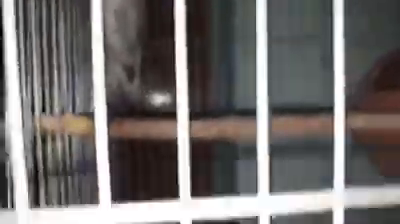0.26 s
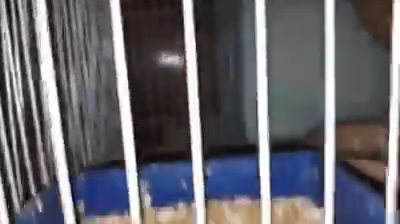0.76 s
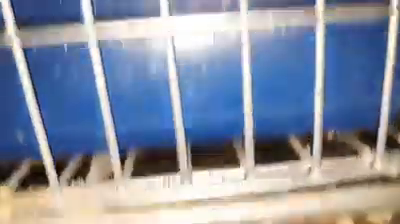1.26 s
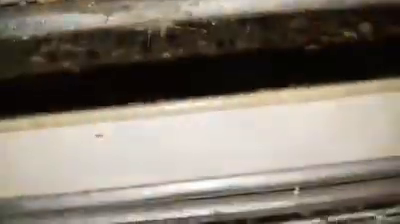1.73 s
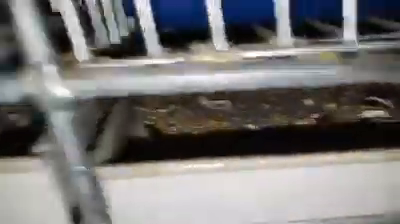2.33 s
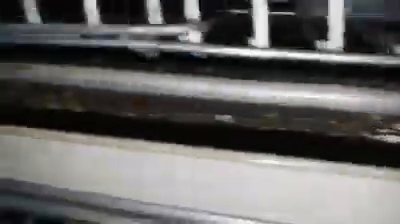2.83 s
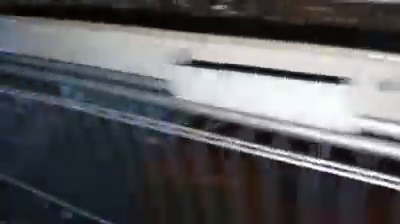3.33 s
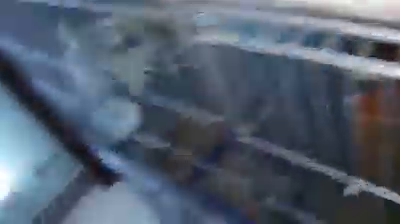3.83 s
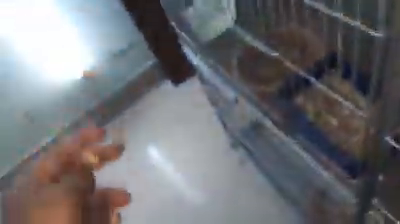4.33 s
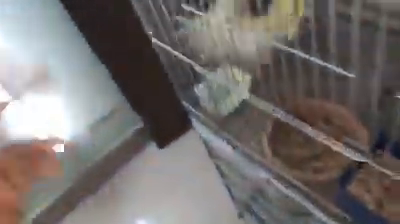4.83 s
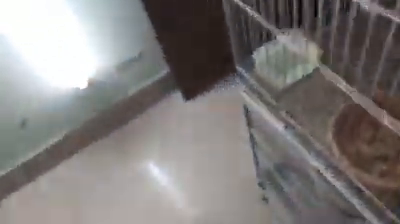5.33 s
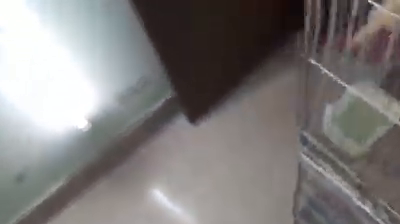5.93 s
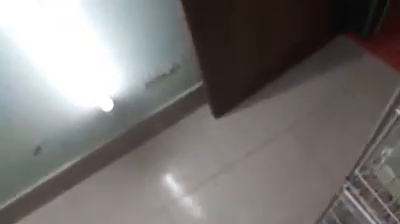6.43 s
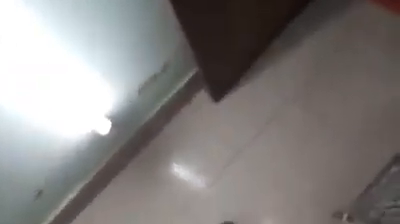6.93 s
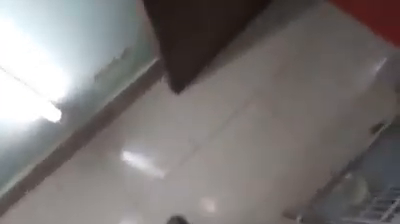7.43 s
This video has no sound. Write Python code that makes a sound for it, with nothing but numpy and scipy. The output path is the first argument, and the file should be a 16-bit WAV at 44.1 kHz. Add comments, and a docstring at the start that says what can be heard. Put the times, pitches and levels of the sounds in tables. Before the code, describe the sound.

Close wing flutter and hard slaps on a wire cage, piercing bird calls, soft rustling and dull microphone taps in an echoing tiled room.

```python
"""In a hard-walled tiled room, lovebirds flutter about a wire cage close to a hand-held camera.
Whistles are gliding harmonic tones; screeches are uneven puffs of noise ringing a throat and beak.
Wings slap the bars, stir the air and brush in bursts of grainy noise, and later a hand or clothes rustle
softly in the same way; calls and strokes ring in the room. A fan hums behind as two tones, under a low
rush of air shaped from noise, and dull taps arrive through the camera's body."""
import sys
import numpy as np
from scipy import signal
from scipy.fft import rfft, irfft, next_fast_len
from scipy.io import wavfile
from scipy.ndimage import uniform_filter1d, minimum_filter1d, map_coordinates

SR = 44100
rng = np.random.default_rng(int(sys.argv[2]) if len(sys.argv) > 2 else 0)


def unload_audio(sound):
    """Save the sound as a 16-bit wav file, at the path given as the first command line argument."""
    columns = np.transpose(np.atleast_2d(sound))
    # keep every value between -1 and 1, then stretch to whole-number steps
    steps = np.round(np.clip(columns, -1, 1) * 32767)
    wavfile.write(sys.argv[1], SR, steps.astype(np.int16))


N = 338247
TOP_HZ = 8630  # upper band limit


def amp(db):
    """Decibels to gain."""
    return 10 ** (np.asarray(db) / 20)


def unit(x):
    """Scale to rms 1."""
    return x / np.sqrt(np.mean(x ** 2) + 1e-20)


def along(points, hz):
    """(Hz, value) points read on a log frequency axis."""
    point_hz, values = np.transpose(points)
    return np.interp(np.log(hz + 1), np.log(point_hz + 1), values)


def curve(rows):
    """(seconds, value) rows as one value per sample."""
    return np.interp(np.arange(N) / SR, *np.transpose(rows))


def wobble(rate, size=N):
    """A smooth random curve with rate knots a second."""
    knots = rng.standard_normal(int(size * rate / SR) + 4)
    return map_coordinates(knots, [np.arange(size) * rate / SR])


def filtered(x, response):
    """x shaped by a response given as a function of frequency."""
    size = next_fast_len(len(x) + 8192)
    spectrum = rfft(x, size) * response(np.fft.rfftfreq(size, 1 / SR))
    return irfft(spectrum, size)[:len(x)]


def coloured(x, spectrum):
    """x with the given (Hz, dB) colour below the band limit, at rms 1."""
    return unit(filtered(x, lambda hz: amp(along(spectrum, hz)) * (hz < TOP_HZ)))


def add(track, s, x):
    """Mix x into the track at s seconds."""
    i = max(round(s * SR), 0)
    track[i:i + len(x)] += x[:max(N - i, 0)]


def gate(size, edge):
    """A flat envelope with soft ends, edge seconds long."""
    return signal.windows.tukey(size, min(2 * edge * SR / size, 1))


def grainy(rate, depth_db):
    """Noise broken into grains, as barbs catch and slip."""
    return unit(rng.standard_normal(N) * amp(depth_db * wobble(rate)))


# Third harmonic: dB over the fundamental when the octave is at 0 dB; dB it gains per dB of the octave.
THIRD_DB, THIRD_FOLLOWS = -6, 0.69


def syrinx(pitch, scatter, db, octave_db, scatter_rate=900, throb_rate=450, throb_db=2.5):
    """A whistle of three harmonics; the more its pitch scatters, the more its level throbs."""
    n = len(pitch)
    scattered_hz = pitch * (1 + scatter * wobble(scatter_rate, n))
    phase = 2 * np.pi * np.cumsum(scattered_hz) / SR
    throb = unit(amp(throb_db * np.tanh(scatter / 0.022) * wobble(throb_rate, n)))
    gains = [1, amp(octave_db), amp(THIRD_DB + THIRD_FOLLOWS * octave_db)]
    tone = sum(g * np.sin(k * phase) for k, g in enumerate(gains, 1))
    tone = tone / np.sqrt(sum(g * g for g in gains) / 2)
    return amp(db) * tone * throb * gate(n, edge=0.0046)


# Short chirps from the cage, near the microphone. Each row: start in seconds, length in seconds,
# start pitch in Hz, end pitch in Hz, pitch scatter as a share, level in dB before the room and mix,
# octave over fundamental in dB.
SHORT_CHIRPS = [(0.0, 0.051, 2900, 2660, 0.06, -32.5, -2), (0.279, 0.055, 2790, 2770, .008, -21, 28),
                (0.369, 0.051, 2050, 2040, .02, -26.5, 1), (0.904, 0.064, 2510, 2490, 0.07, -46, -9),
                (1.002, 0.17, 3750, 3500, 0.12, -47, -22), (1.332, 0.035, 2500, 2650, 0.14, -34, 3),
                (2.245, 0.042, 4730, 3710, 0.092, -23.5, -11), (2.508, 0.049, 2976, 3100, 0.019, -16, -12),
                (4.07, 0.055, 3200, 3150, 0.014, -40, -3), (4.681, 0.084, 3170, 3214, 0.032, -32.5, 6.5),
                (6.066, 0.15, 2514, 2530, .065, -38, -14), (6.092, 0.075, 3590, 2970, 0.075, -30, 1),
                (6.197, 0.0385, 2900, 2760, 0.036, -14, 27), (6.47, 0.065, 2350, 2916, 0.052, -23.5, 16),
                (6.541, 0.055, 3050, 3106, 0.0089, -16, 4), (6.622, .06, 4687, 4687, .001, -16.5, -40),
                (6.884, .055, 3500, 2600, 0.032, -19, 3.5), (6.896, 0.046, 2850, 2040, .03, -24.5, 2),
                (6.947, 0.053, 2350, 3100, 0.02, -26.5, 4), (7.255, .028, 3246, 3154, 0.026, -21.5, 7),
                (7.291, .083, 3190, 3200, 0.023, -26.5, -16),
                (7.263, 0.087, 2150, 2066, 0.032, -28.5, -1.5)]
# Long calls from the cage, one list of rows per call. Each row: time in seconds, pitch in Hz,
# pitch scatter as a share, level in dB before the room and mix, octave over fundamental in dB.
BENDING_CALLS = [
    [(.241, 2480, 0.053, -27.5, 3), (.28, 2540, 0.032, -13, 15), (.305, 2600, 0.0057, -14.5, -1),
     (.322, 2560, 0.043, -24, 14), (.38, 2520, .015, -16, 18), (.42, 2630, 0.051, -20, 20),
     (.478, 2580, 0.054, -12, 29)],
    [(2.289, 2150, 0.077, -12, -19), (2.336, 3000, 0.063, -18.5, -19), (2.346, 3275, 0.0042, -7.5, -25),
     (2.372, 3300, .005, -14, -28), (2.384, 2810, 0.061, -17, -26), (2.47, 2653, 0.049, -14.5, -9),
     (2.57, 2468, 0.067, -19.5, -10), (2.636, 2370, 0.049, -19.5, 4)],
]


def whistles():
    """Chirps glide straight from one pitch to another; long calls bend and change colour as they go."""
    out = np.zeros(N)
    for s, length, start_hz, end_hz, scatter, db, octave_db in SHORT_CHIRPS:
        glide = np.linspace(start_hz, end_hz, int(length * SR))
        add(out, s, syrinx(glide, scatter, db, octave_db))
    for call in BENDING_CALLS:
        times, *controls = np.transpose(call)
        t = np.arange(times[0], times[-1], 1 / SR)
        add(out, times[0], syrinx(*[np.interp(t, times, c) for c in controls]))
    return out


# Harsh screeches, near the microphone. Each row: start in seconds, length in seconds, level in dB
# before the room and mix, swell over the length in dB, syrinx resonance in Hz,
# beak resonance in Hz, beak resonance level in dB.
HARSH_SCREECHES = [(0.259, 0.0345, -15, 4, 2300, 5300, 9.5), (0.317, 0.062, -17.5, -1, 2660, 6250, 16),
                   (.371, .055, -14.5, 17, 2240, 5200, 10.5), (2.456, 0.036, -17.5, -6, 2700, 6100, 10),
                   (2.571, 0.074, -20, -1, 2600, 6060, 14), (4.066, 0.055, -36, -1, 3070, 6600, 5),
                   (6.169, 0.05, -15, 1, 3470, 5630, 6.5), (6.498, .075, -15.5, 0, 2710, 6030, 2),
                   (6.567, 0.067, -12.5, -9, 3750, 4040, 11), (6.873, 0.16, -23, 2.5, 1990, 3100, -1.5),
                   (6.97, 0.078, -16.5, 5.5, 2900, 4040, 7.5), (7.125, .097, -32.5, 2, 2900, 4020, 2),
                   (7.214, 0.061, -23.5, 3, 2870, 4000, 8), (7.26, 0.061, -29.5, 4, 2300, 5250, 6)]
# Throat resonances shared by all screeches. Each row: centre in Hz, nominal width in Hz
# (the sharpness setting scales it), level in dB.
THROAT_RESONANCES = [(4220, 520, 0), (5470, 820, -2), (6380, 450, 1), (8030, 760, -2.5)]
SYRINX_WIDTH_HZ, SYRINX_DB, BEAK_WIDTH_HZ = 290, -2, 465  # widths nominal, as in the throat table
PUFF_RATE = 540  # puffs a second, before jitter


def screeches(jitter=.25, puff_decay=5, sharpness=0.61):
    """Driven hard, the syrinx breaks into uneven puffs that ring the throat; the beak picks out one band."""
    out = np.zeros(N)
    for s, length, db, swell_db, syrinx_hz, beak_hz, beak_db in HARSH_SCREECHES:
        n = int(length * SR)
        throat = [*THROAT_RESONANCES, (syrinx_hz, SYRINX_WIDTH_HZ, SYRINX_DB), (beak_hz, BEAK_WIDTH_HZ, beak_db)]
        cycle = np.cumsum(PUFF_RATE * (1 + jitter * wobble(PUFF_RATE, n))) / SR % 1
        puffs = np.exp(-puff_decay * cycle) * rng.standard_normal(n)

        def tract(f):
            """Resonances summed as power."""
            return np.sqrt(sum(amp(level) ** 2 / (1 + (sharpness * (f - hz) / width) ** 2) ** 6
                               for hz, width, level in throat))

        swell = amp(db + swell_db * np.linspace(-.5, .5, n))
        add(out, s, unit(filtered(puffs, tract)) * swell * gate(n, edge=0.0014))
    return out


# Hard wing strokes against the cage bars, near the microphone. Each row: start in seconds,
# slap level in dB, push of air over the slap in dB, both before their layer gains.
HARD_STROKES = [(.0674, -17, 4), (.176, -21, 2), (1.265, -20, -6), (1.411, -18, -10), (1.4564, -18, 17),
                (1.534, -10, 4.5), (1.585, -17, 16), (1.6821, -16.5, 15.5), (1.7605, -14.5, 18.5),
                (1.7876, -12.5, -7), (1.807, -18, -7), (1.901, -15.5, 14), (1.955, -18.5, 13),
                (2.015, -21, 14), (2.052, -13.5, 1), (2.1046, -11.5, 7), (2.1197, -10.5, 8),
                (2.2308, -6.5, -7), (2.3602, -3, -8), (2.424, -7.5, 5), (2.753, -16.5, 3),
                (2.8563, -21, 16), (3.253, -23, 13), (3.3278, -23, 2), (3.3734, -19.5, -15),
                (3.433, -18, -8), (3.464, -16.5, -3), (4.6237, -12, 9), (4.6377, -19, 12),
                (4.7158, -15, -16), (4.7872, -6.5, 14), (4.8595, -17.5, 11), (4.9106, -20.5, 14)]
# Colour of feathers slapping wire, heard close. Each row: frequency in Hz, relative level in dB per Hz.
SLAP_COLOUR = [(200, -42), (600, -2.5), (1500, 4), (3300, 0.5), (5000, -1.5), (8500, 1.5)]


def strokes(rows, snap_t60=0.032, swish_t60=0.26, swish_db=-15, rise=0.00047):
    """Each stroke is a slap of stiff feathers, a trailing swish and a push of air; times in seconds."""
    slap, push = np.zeros(N), np.zeros(N)
    t = np.arange(SR // 5) / SR
    decay = amp(-60 * t / snap_t60) + amp(swish_db - 60 * t / swish_t60)
    shape = (1 - np.exp(-t / rise)) * decay
    for s, db, push_db in rows:
        add(slap, s, amp(db) * shape)
        add(push, s, amp(db + push_db) * shape)
    push_colour = [(40, -23), (120, 1.5), (350, -1.5), (900, -11), (2500, -18.5)]  # (Hz, dB)
    air = coloured(rng.standard_normal(N), push_colour)
    feathers = coloured(grainy(rate=1500, depth_db=0.5), SLAP_COLOUR)
    return amp(-6) * slap * feathers + amp(-20.5) * push * air


# Light strokes: number a second; slap level over the stirred-air gain, its spread, push over slap, in dB.
LIGHT_RATE, LIGHT_DB, LIGHT_SCATTER_DB, LIGHT_PUSH_DB = 12, 10.5, -0.5, 6


def light_strokes(air):
    """Lighter strokes at uneven intervals follow the stirred air of the moment: rows like HARD_STROKES."""
    count = int(LIGHT_RATE * N / SR)
    late, size = rng.random((count, 2)).T
    at = ((np.arange(count) + late) * N / count).astype(int)
    levels = 20 * np.log10(air[at]) + LIGHT_DB + LIGHT_SCATTER_DB * (2 * size - 1)
    return [(i / SR, db, LIGHT_PUSH_DB) for i, db in zip(at, levels)]


# Bursts of wing work and, from 3.651 to 5.498 seconds, soft rustling of a hand or clothes, all close.
# Each row: start in seconds, rise in seconds, length before dying away in seconds, stirred air in dB,
# brushing in dB, swell over the burst in dB; both levels are before the gains in flutter_and_rustle,
# and the brushing takes only a share of the swell.
MOVEMENT_BURSTS = [(-.05, 0.034, 0.26, -36, -31.5, -3), (1.215, 0.037, .17, -40, -35, 2),
                   (1.428, 0.042, 0.98, -35, -34.5, 9.5), (2.16, 0.039, 0.57, -33, -29.5, -9),
                   (3.25, 0.1, 0.39, -43.5, -39, 3), (3.651, 0.26, .28, -41, -33.5, 4),
                   (4.036, 0.032, 0.24, -41, -38, -5), (4.317, 0.15, 0.47, -42, -36.5, 3),
                   (5.01, 0.038, 0.059, -43, -37, 6), (5.146, 0.049, .16, -45.5, -46, 4),
                   (5.498, 0.066, 0.2, -56, -40.5, -6), (5.89, 0.11, 1.646, -47, -38.5, -0.5)]
BRUSH_SWELLS = 0.35  # share of a burst's swell that reaches the brushing
IDLE_AIR_DB, IDLE_BRUSH_DB = -50.5, -46  # fidgeting between bursts, before the same gains
RELEASE_T60_S = 0.69  # how a burst dies away


def movement():
    """Gains of stirred air and of brushing: each burst rises, swells or fades while it lasts, and dies away."""
    t = np.arange(N) / SR
    air, brush = amp(IDLE_AIR_DB), amp(IDLE_BRUSH_DB)
    for s, rise, length, air_db, brush_db, swell_db in MOVEMENT_BURSTS:
        release = amp(-60 * np.maximum(t - s - length, 0) / RELEASE_T60_S)
        shape = np.clip((t - s) / rise, 0, 1) * release
        swell = swell_db * (np.clip((t - s) / length, 0, 1) - .5)
        air = np.maximum(air, shape * amp(air_db + swell))
        brush = np.maximum(brush, shape * amp(brush_db + BRUSH_SWELLS * swell))
    return air, brush


# Colour of air stirred close to the microphone. Each row: frequency in Hz, relative level in dB per Hz.
STIRRED_AIR_COLOUR = [(18, -30.5), (30, -15.5), (98, -1), (194, -12.5), (289, -0.5), (464, -7), (522, -8.5),
                      (1160, -10.5), (3970, -20.5), (8450, -30.5), (11000, -42), (18600, -120)]
# Colour of the brushing, heard close. Each row: frequency in Hz, relative level in dB per Hz.
BRUSHING_COLOUR = [(800, -34), (2000, 3), (3300, 6), (4200, -1.5), (6000, 3.5), (7500, 2), (8600, 2.5)]


def flutter_and_rustle(air, brushing, beat_rate=19, beat_db=2, whoosh_db=4, brush_db=-2):
    """Quick beats, beat_rate a second on average, sway a whoosh of stirred air and a softer brushing."""
    uneven_rate = beat_rate * (1 + 0.202 * wobble(8.9))
    beat = np.sin(2 * np.pi * np.cumsum(uneven_rate) / SR)
    stirred = coloured(grainy(rate=630, depth_db=2), STIRRED_AIR_COLOUR)
    whoosh = air * amp(whoosh_db + beat_db * beat) * stirred
    barbs = coloured(grainy(rate=1700, depth_db=1.5), BRUSHING_COLOUR)
    brush = brushing * amp(brush_db + 1.0 * beat) * barbs
    return whoosh + brush


# Taps on the camera, right at the microphone. Each row: start in seconds, knock peak in dB,
# contact time scale in seconds, click over the knock in dB before a fixed lift.
CAMERA_TAPS = [(3.8042, -18, 0.00075, -30), (4.0692, -9.5, 0.00049, -22), (4.2266, -2.5, 0.00026, -23),
               (5.1947, -12.5, 0.00043, 0), (5.3562, -3.5, 0.00034, 0.5), (5.6894, -9.5, 0.00027, -3),
               (5.9022, -9.5, 0.000083, -1), (6.4241, -13.5, 0.00015, -20)]
# Ringing modes of the camera's body, around the microphone.
# Each row: frequency in Hz, 60 dB decay time in seconds, relative level in dB.
BODY_MODES = [(238, 0.019, 0), (520, 0.0033, 8), (1230, 0.0046, 0.5)]


def taps():
    """A fingertip pushes the camera's body, which rings very briefly; a firm contact adds a click."""
    out, t = np.zeros(N), np.arange(SR // 30) / SR
    ring = sum(amp(db - 60 * t / t60) * np.cos(2 * np.pi * hz * t) for hz, t60, db in BODY_MODES)
    # the held body leaks slow pressure away
    ring = signal.lfilter(*signal.butter(1, 130, 'high', fs=SR), ring)
    for s, db, contact, click_db in CAMERA_TAPS:
        push = t * np.exp(-2 * t / contact)
        knock = np.convolve(push, ring)[:len(t)]
        knock = knock / np.abs(knock).max()
        click = np.diff(np.exp(-t / .0002), prepend=0)
        add(out, s, amp(db) * (knock + amp(click_db + 2.0) * click))
    return out


# Colour of the low rush of air. Each row: frequency in Hz, relative level in dB per Hz.
LOW_RUSH_COLOUR = [(15, -43), (25, -36.5), (80, -17), (118, 2), (149, -12.5), (248, -3.5), (294, -7.5),
                   (326, -4.5), (499, -10.5), (592, -13), (2300, -23.5), (4000, -34), (5200, -51),
                   (8800, -120)]
# Level of the low rush of air at the microphone, from fan and wings together.
# Each row: time in seconds, level in dB before the low cut.
LOW_RUSH_LEVEL = [(0.0, -38.5), (0.19, -29), (0.45, -36), (1.26, -39), (1.83, -31), (2.24, -27.5),
                  (2.97, -39), (4.59, -33), (6.09, -32), (7.3, -40.5), (7.67, -37.5)]
# The motor's two hums, from behind. Each row: frequency in Hz, level in dB before its swell and wobble.
MOTOR_HUMS = [(119.5, -48), (328.4, -50)]
# Swell of the two hums at the microphone. Each row: time in seconds, deep hum in dB, upper hum in dB.
MOTOR_SWELL = [(0, -9, -2), (1.1, 4, 0.5), (3.2, -7.5, -2.5), (4.0, 11.5, 1.5), (5.4, -4, -3),
               (6.2, -1, 3.5), (7.67, 1, 5.5)]


def fan_and_low_rush():
    """A slightly unsteady motor hum of two swelling tones, and noise as a low rush that comes and goes."""
    t = np.arange(N) / SR
    times, *swells = np.transpose(MOTOR_SWELL)
    hum = np.zeros(N)
    for (hz, db), swell in zip(MOTOR_HUMS, swells):
        level = amp(db + np.interp(t, times, swell) + 2.6 * wobble(6.4))
        hum += level * np.sqrt(2) * np.sin(2 * np.pi * hz * t + 0.45 * wobble(4.6))
    rush = coloured(rng.standard_normal(N), LOW_RUSH_COLOUR)
    # thin out the deepest rumble
    rush = signal.lfilter(*signal.butter(1, 35, 'high', fs=SR), rush)
    return hum + amp(curve(LOW_RUSH_LEVEL)) * rush


# Ringing of the tiled room around cage and microphone.
# Each row: frequency in Hz, 60 dB decay time in seconds.
ROOM_DECAY = [(200, 0.86), (2500, 0.51), (5000, 0.44), (8500, 0.34)]


def room(x, wet_db):
    """Hard walls answer with a dense tail; direct sound and tail together about keep the power of x."""
    hz, t, bands = signal.stft(rng.standard_normal(int(SR * .7)), SR, nperseg=256)
    decay = amp(-60 * t / along(ROOM_DECAY, hz)[:, None])
    tail = signal.istft(bands * decay, SR, nperseg=256)[1]
    tail = np.pad(tail / np.linalg.norm(tail), (130, 0))  # 130 samples before the walls answer
    wet = signal.fftconvolve(x, tail)[:N]
    return (x + amp(wet_db) * wet) / np.hypot(1, amp(wet_db))


def limiter(x, ceiling_db=-6.5, hold=0.035, window=0.0039):
    """The gain drops when the short-term level passes the ceiling, and takes the background down with it."""
    power = uniform_filter1d(x * x, max(int(window * SR), 1))
    level = np.sqrt(np.abs(power) + 1e-12)
    needed = np.minimum(1, amp(ceiling_db) / level)
    span = max(int(hold * SR), 3)
    held = minimum_filter1d(needed, span, origin=span // 3)
    return x * uniform_filter1d(held, max(span // 3, 1))


def scene():
    """Birds in the room, soft rustling close by, hum and low rush behind, taps right at the microphone."""
    calls = room(whistles(), wet_db=-5.0) * amp(2.5) + room(screeches(), wet_db=-4.0) * amp(2.5)
    air, brushing = movement()
    all_strokes = strokes([*HARD_STROKES, *light_strokes(air)])
    moving = room(all_strokes, wet_db=-6.0) + flutter_and_rustle(air, brushing)
    return (calls + moving + fan_and_low_rush() + taps())[None]


def record(dry):
    """A limiter holds loud moments down, peaks are rounded off, and a steep cut acts at the band limit."""
    x = limiter(dry[0])
    x = x / (1 + np.abs(x) ** 6) ** (1 / 6)
    return filtered(x, lambda hz: 1 / np.sqrt(1 + (hz / TOP_HZ) ** 240))[None]


dry = scene()
out = record(dry)
unload_audio(out)
```